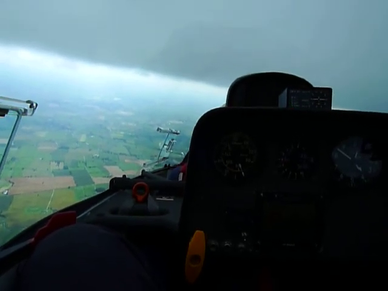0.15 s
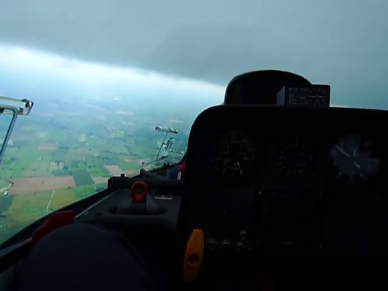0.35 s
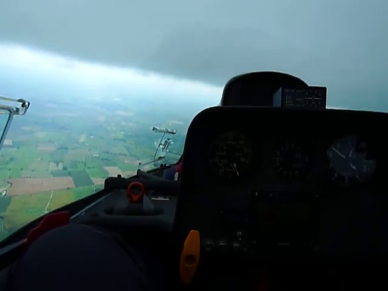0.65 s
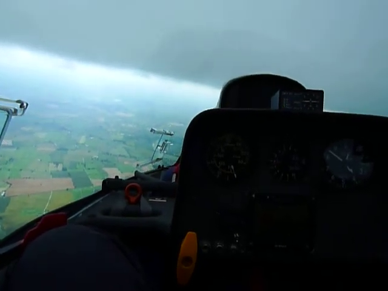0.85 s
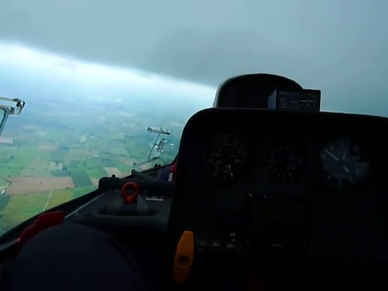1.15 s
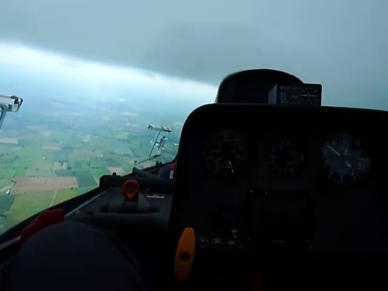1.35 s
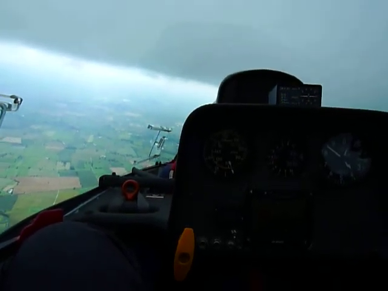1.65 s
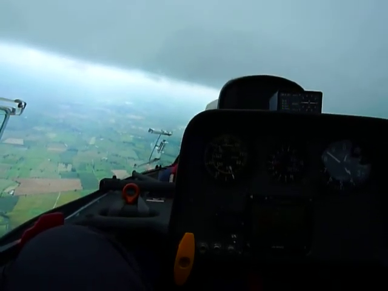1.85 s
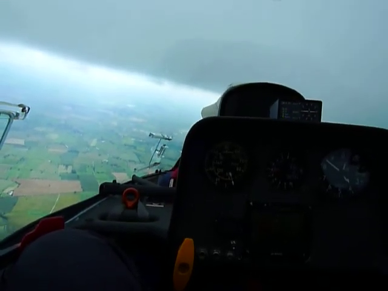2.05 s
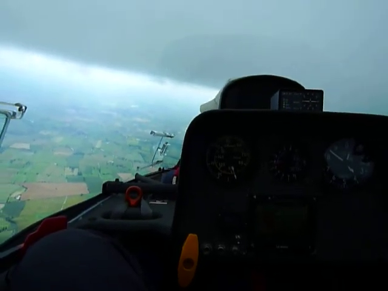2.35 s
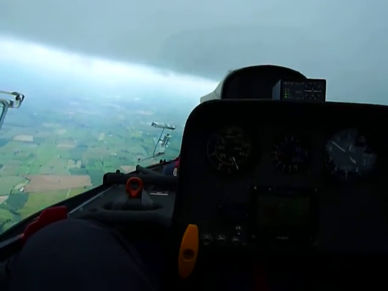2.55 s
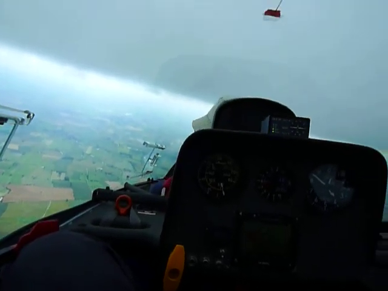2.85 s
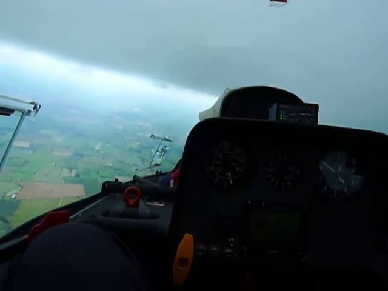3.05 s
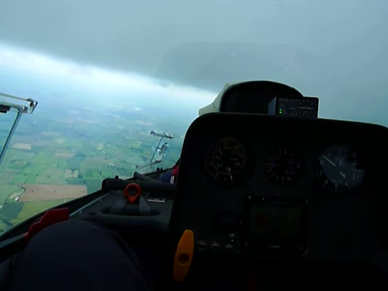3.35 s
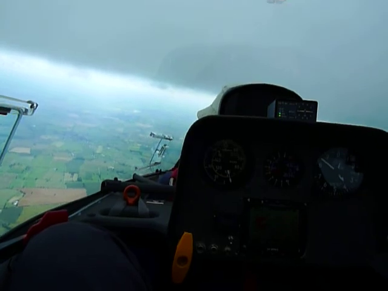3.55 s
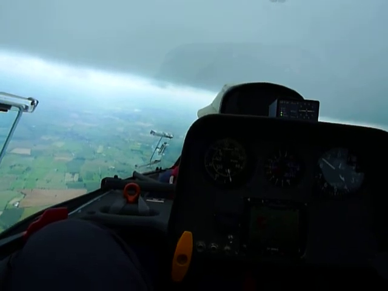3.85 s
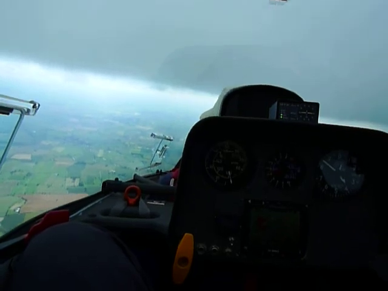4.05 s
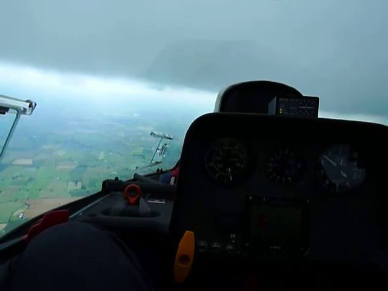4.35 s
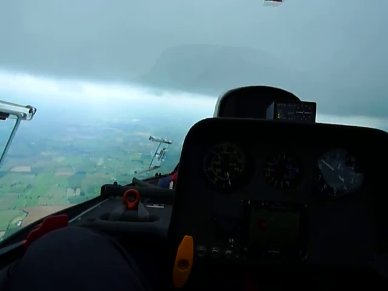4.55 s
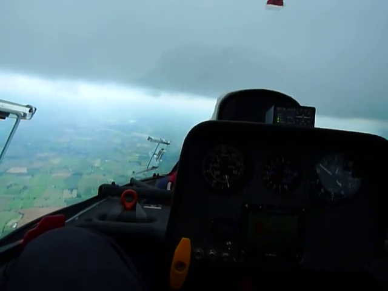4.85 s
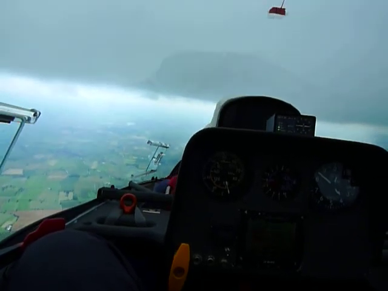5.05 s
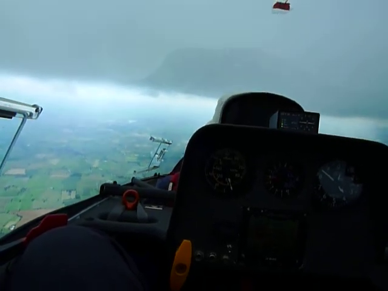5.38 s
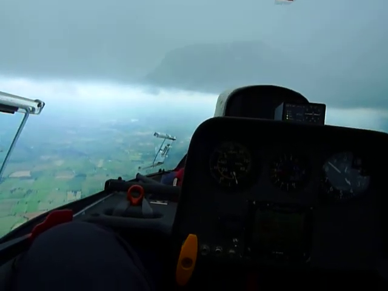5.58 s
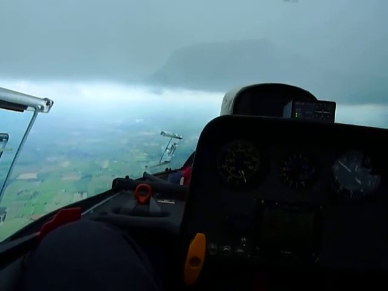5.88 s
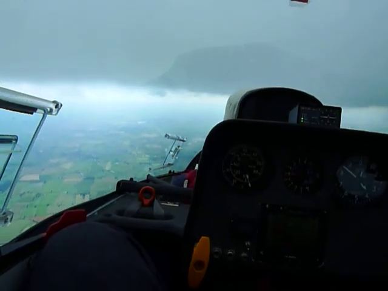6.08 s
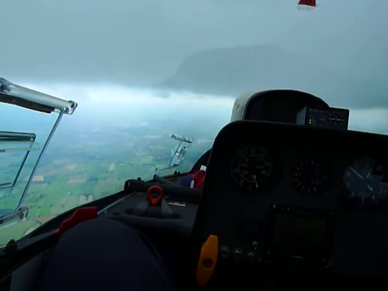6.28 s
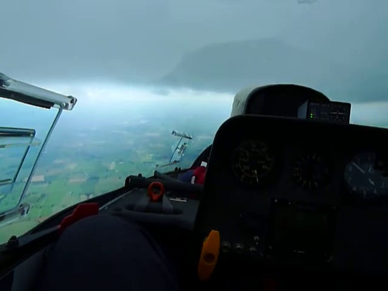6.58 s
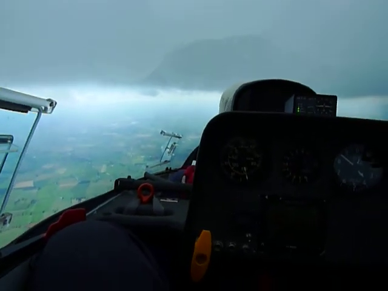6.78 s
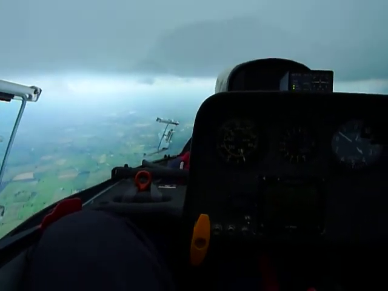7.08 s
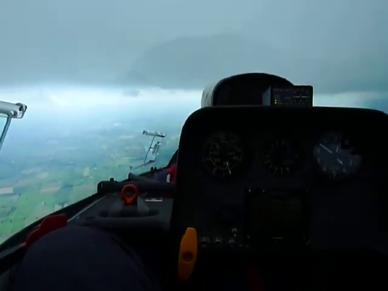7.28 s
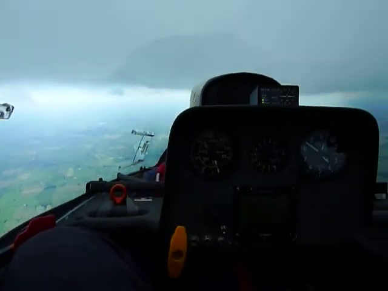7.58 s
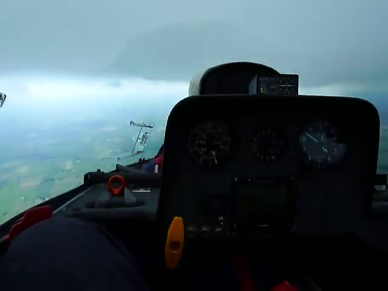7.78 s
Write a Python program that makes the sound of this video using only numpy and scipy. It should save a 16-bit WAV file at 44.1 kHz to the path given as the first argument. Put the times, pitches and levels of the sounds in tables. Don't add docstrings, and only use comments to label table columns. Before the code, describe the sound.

Inside a glider cockpit, air rushes steadily over the canopy, low, muffled and slightly hollow, gently buffeting. A faint thin whine comes from the hand-held camera. After about two seconds a dense burst of thuds and ticks knocks the camera; scattered bumps follow. Each strong knock makes the wind duck, then swell back. The treble is dull.

```python
import sys
import numpy as np
from scipy import signal
from scipy.fft import rfft, irfft
from scipy.io import wavfile
from scipy.ndimage import uniform_filter1d

SR = 44100
rng = np.random.default_rng(int(sys.argv[2]) if len(sys.argv) > 2 else 0)


def magnitude_from_level(level_db):
    exponent = np.asarray(level_db, float) / 20
    return 10 ** exponent


def pcm_store(signal):
    levels = np.round(np.clip(np.atleast_2d(signal), -1, 1) * 32767)
    wavfile.write(sys.argv[1], SR, levels.astype(np.int16).T)


N = 349272
T = np.arange(N) / SR
HZ = np.fft.rfftfreq(N, 1 / SR) + 1


def level(x, db):
    return x * magnitude_from_level(db) / np.sqrt(np.mean(x ** 2))


def slope_db(points):
    hz, db = np.transpose(points)
    return np.interp(np.log(HZ), np.log(hz), db, right=-200)


def walk(rate_hz):
    hold = int(SR / rate_hz)
    steps = np.repeat(rng.standard_normal(N // hold + 1), hold)
    return 1.05 * uniform_filter1d(uniform_filter1d(steps, hold), hold)[:N]


def ring(t, hz, length_s, phase=0):
    swell = np.exp(-(t / (0.57 * length_s)) ** 2)
    decay = 1 / np.cosh(t / length_s)
    return np.cos(2 * np.pi * hz * t + phase) * np.where(t < 0, swell, decay)


# frequency in Hz, level in dB per Hz.
HISS_COLOUR = [(60, -0.5), (5000, -3), (7400, -4), (8000, -9.5), (8500, -18.5), (8900, -39)]


def converter_noise():
    noise = rfft(rng.standard_normal(N))
    hiss = level(irfft(noise * magnitude_from_level(slope_db(HISS_COLOUR)), N), -66)
    clock_hz = 6222
    return hiss + magnitude_from_level(-85.5) * np.sin(2 * np.pi * clock_hz * T)


# time in seconds, whine level in dB.
DRIVE_LOAD = [(0, -54), (2.2, -46), (3.0, -42.5), (4.5, -48), (5.2, -43.5), (5.95, -39.5), (6.75, -39),
              (7.0, -44), (7.92, -46)]


def whine():
    whine_hz = 1920.5
    db = np.interp(T, *np.transpose(DRIVE_LOAD))
    return np.sqrt(2) * magnitude_from_level(db + 1.1 * walk(17)) * np.sin(2 * np.pi * whine_hz * T)


# start in seconds, depth in dB, wait before the climb in seconds.
OVERLOADS = [(.29, 2.5, 0.12), (1.92, 1.5, .03), (2.308, 5.5, 0.048), (2.413, 1, 0.096),
             (2.792, 8.5, 0.084), (4.263, 10.5, 0.049), (4.918, 5.5, 0.031), (5.565, 4.5, 0.083),
             (5.644, 5, 0.064), (6.302, 2, 0.064), (6.863, 7, 0.13), (7.437, 6.5, 0.1)]


def duck_db():
    attack_s, release_db_per_s = 0.023, 15
    pull = sum(db * np.clip((T - s) / attack_s, 0, 1) for s, db, wait in OVERLOADS)
    waiting = sum((T > s) & (T < s + wait) for s, db, wait in OVERLOADS) > 0
    owed = pull - release_db_per_s * np.cumsum(~waiting) / SR
    return owed - np.minimum.accumulate(np.minimum(owed, 0))


def control_leak():
    sag = sum(db * np.exp(-((T - s) / 0.06) ** 2) for s, db, wait in OVERLOADS)
    return -0.007 - 0.0006 * sag


# start in seconds, thud level in dB, tick level in dB.
JOLTS = [(1.8314, -16.5, -19.5), (2.309, -12, -18.5), (2.406, -14, -13.5), (2.4134, -9.5, -18.5),
         (2.4371, -22, -19), (2.4702, -8.5, -29.5), (2.529, -17, -40), (2.566, -15, -31),
         (2.6192, -14, -30), (2.649, -20, -17), (2.6664, -13, -24), (2.6827, -19, -22.5),
         (2.731, -13.5, -20), (2.7911, -10.5, -21.5), (3.1987, -12, -19.5), (3.4328, -22, -20),
         (4.2602, -13.5, -15), (4.3868, -13.5, -33), (4.8471, -14, -28), (4.9184, -12, -18.5),
         (5.5621, -15, -14.5), (5.6046, -16, -21.5), (5.611, -14, -22), (5.6436, -11.5, -25),
         (6.3017, -10, -18), (6.7891, -15, -32), (6.863, -12.5, -17), (7.4093, -17, -31), (7.436, -10, -17),
         (7.4397, -16, -25)]


def knocks():
    tick_s, thud_s, scrape_s = 0.00084, 0.0011, 0.0034
    before, after = 300, 1200
    t = np.arange(-before, after) / SR
    out = np.zeros(N)
    chance = rng.random((len(JOLTS), 3))
    scrape_band = signal.butter(4, [1000, 3400], "band", fs=SR, output="sos")
    grit = signal.sosfilt(scrape_band, rng.standard_normal(N))
    for (s, thud_db, tick_db), (a, b, c) in zip(JOLTS, chance):
        thud_hz = 484 + 9.5 * (tick_db + 20)
        scrape_db = tick_db - 11.5
        tick_hz = 1210 * (0.85 + 0.23 * a)
        lag = 0.0037 + 0.0043 * b

        tick = ring(t - 0.001, tick_hz, tick_s)
        tick += 0.5 * ring(t - 0.0005, 0.69 * tick_hz, tick_s)
        tick += 0.48 * ring(t - lag, tick_hz, tick_s)

        thud = ring(t, thud_hz, thud_s, 2 * np.pi * c)
        thud += 0.24 * ring(t - 1.32 * lag, 0.77 * thud_hz, thud_s)
        thud += 0.37 * ring(t - 0.002, 230, 0.004, 2 * np.pi * b)

        start = int(s * SR)
        span = slice(start - before, start + after)
        scrape = 1.8 * grit[span] * ring(t - 0.001, 0, scrape_s)
        out[span] += magnitude_from_level(thud_db - 1) * thud + magnitude_from_level(tick_db + 4) * tick + magnitude_from_level(scrape_db) * scrape
    return out * magnitude_from_level(duck_db())


# frequency in Hz, level in dB per Hz.
RUSH_COLOUR = [(15, -64), (25, -29), (50, -15), (77, -2.5), (160, -1), (265, -5), (400, -10), (745, -12),
               (1380, -16.5), (2190, -21), (3300, -25), (4200, -35.5), (5200, -41), (7800, -56.5)]
# frequency in Hz, width in Hz, gain in dB.
CABIN_MODES = [(108, 16, 2), (124, 20, -4), (186, 8.7, -5.5), (226, 42, 6), (366, 51, 5), (406, 15, -1),
               (476, 20, 1.5), (635, 37, 2), (763, 99, -4), (836, 32, -3.5), (983, 141, 8), (1100, 21, 0.5),
               (1256, 46, 7.5), (1413, 59, -3), (1538, 69, 7), (1694, 60, 8), (1805, 83, -2.5),
               (1913, 41, 2.5), (2070, 110, 3.5), (2270, 66, 0), (2375, 106, 9), (2588, 110, 6),
               (2820, 120, 5.5), (3045, 110, 2.5), (3260, 100, 2.5), (3520, 90, -0.5)]
# time in seconds, level in dB before the gain control.
RUSH_LEVEL = [(0, -22), (1.4, -22), (1.9, -23.5), (2.6, -22), (3.1, -19.5), (3.7, -22.5), (4.5, -21.5),
              (5.0, -22.5), (5.5, -23), (5.9, -20.5), (6.6, -22.5), (7.2, -21), (7.92, -23.5)]


def airflow():
    rush_db = np.interp(T, *np.transpose(RUSH_LEVEL))
    rumble_db = -0.12 + walk(3.4)
    modes_db = sum(db / (1 + (2 * (HZ - hz) / width) ** 2) for hz, width, db in CABIN_MODES)
    noise = rfft(rng.standard_normal(N)) * magnitude_from_level(slope_db(RUSH_COLOUR) + modes_db)
    place = np.clip(2 * np.log2(HZ / 30), 0, 16)
    buffet = walk(22)
    out = np.zeros(N)
    for k in range(17):
        share = np.clip(1 - np.abs(place - k), 0, 1)
        low = np.clip((7.5 - k) / 3, 0, 1)
        flicker_db = 0.87 * walk(8)
        sway_db = low * rumble_db + 0.41 * (1 - low) * buffet + flicker_db
        out += magnitude_from_level(sway_db) * irfft(noise * share, N)
    return level(out, 0) * magnitude_from_level(rush_db)


def scene():
    return (whine() + knocks() + airflow())[None]


def band_limit(x):
    return signal.sosfilt(signal.butter(12, 8820, fs=SR, output="sos"), x)


def record(dry):
    loud = dry * magnitude_from_level(-duck_db())
    ceiling = 0.3
    loud = loud / (1 + (loud / ceiling) ** 10) ** (1 / 10)
    loud = loud * np.clip(T / 0.00081, 0, 1)
    treble_cut = signal.butter(6, 3936, fs=SR, output="sos")
    loud = signal.sosfilt(treble_cut, loud)
    return band_limit(loud + converter_noise() + control_leak())


dry = scene()
out = record(dry)
pcm_store(out)
```